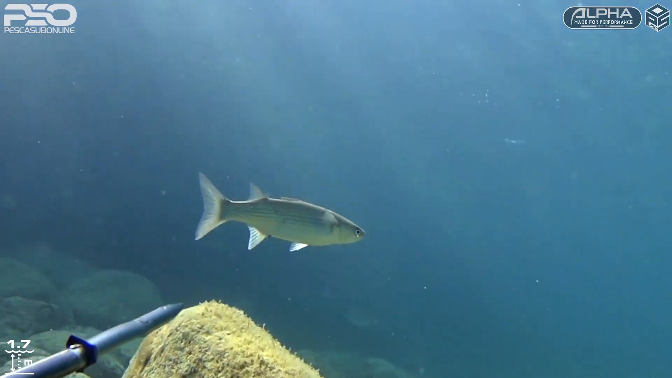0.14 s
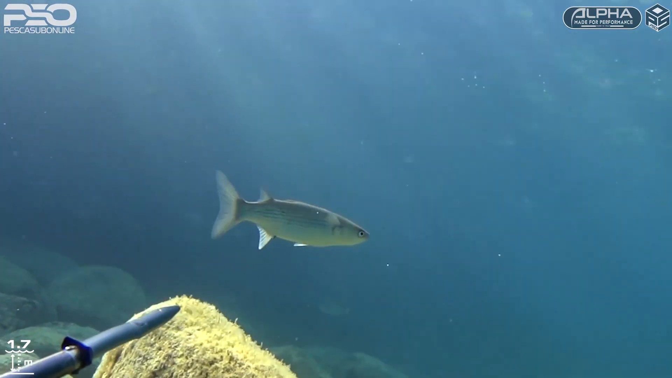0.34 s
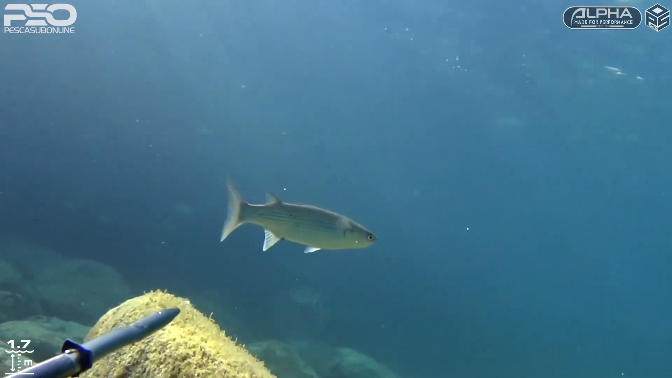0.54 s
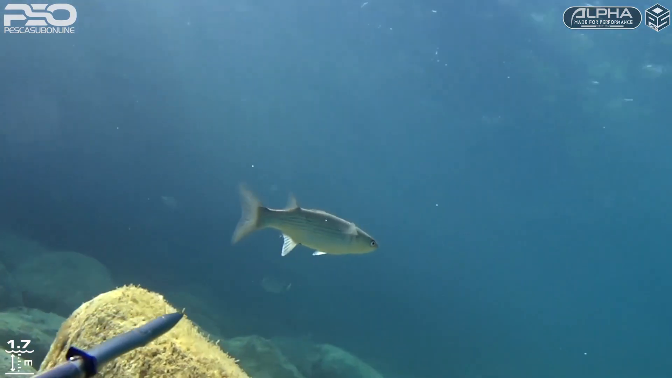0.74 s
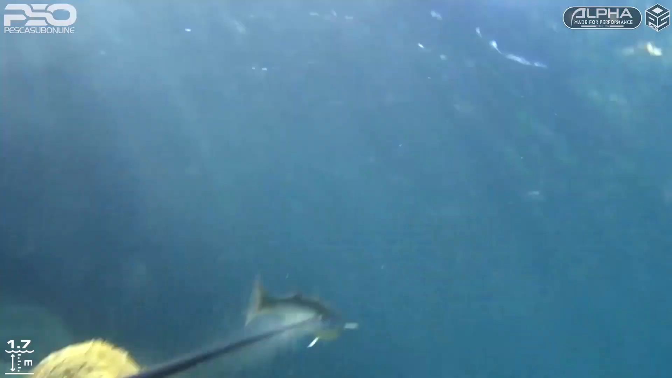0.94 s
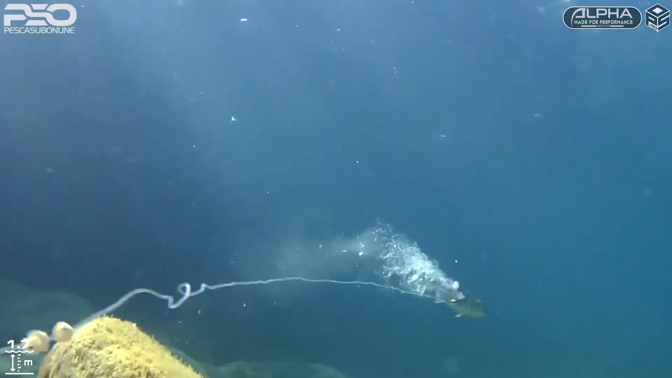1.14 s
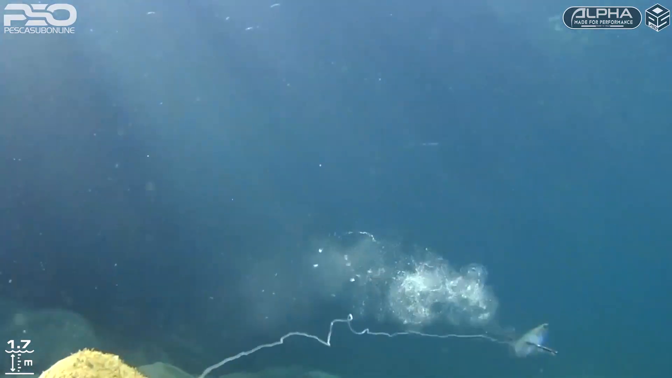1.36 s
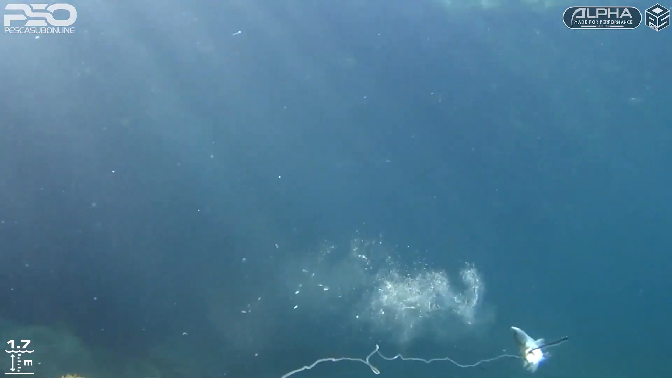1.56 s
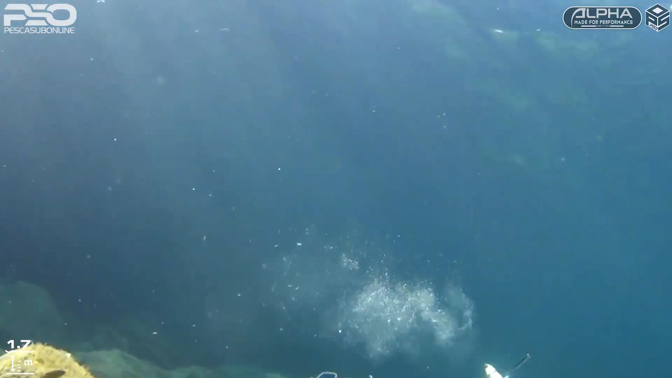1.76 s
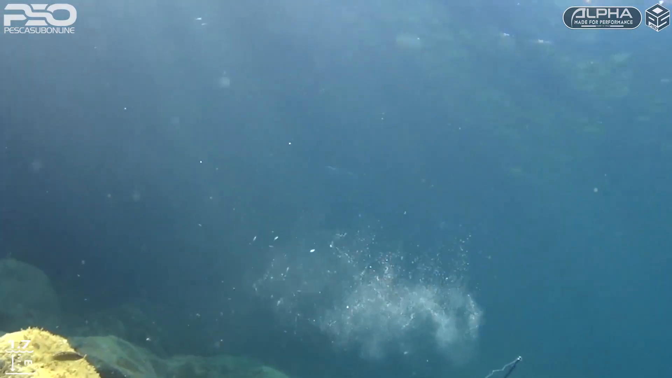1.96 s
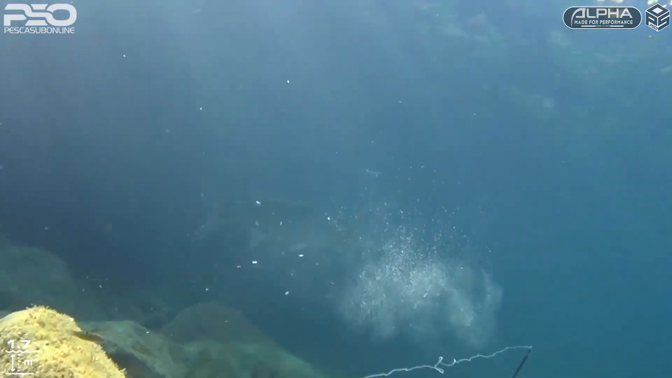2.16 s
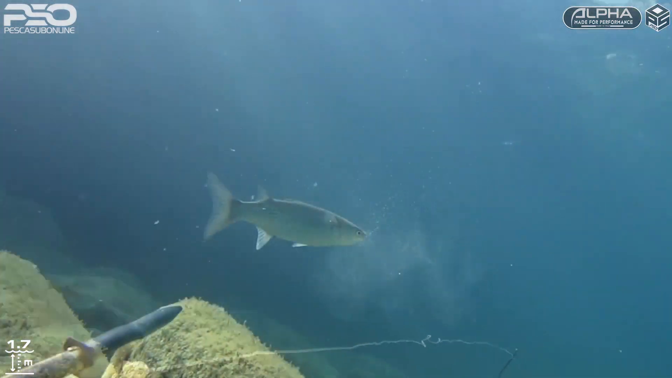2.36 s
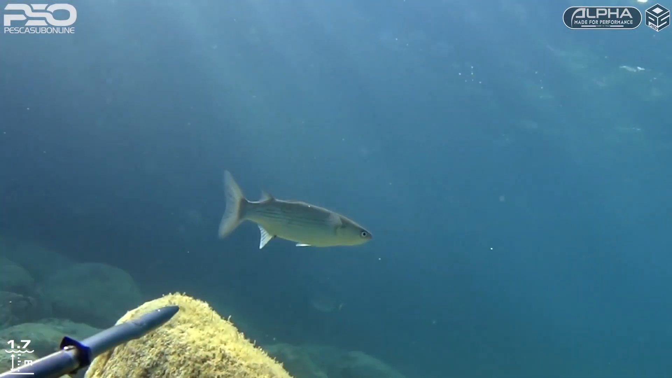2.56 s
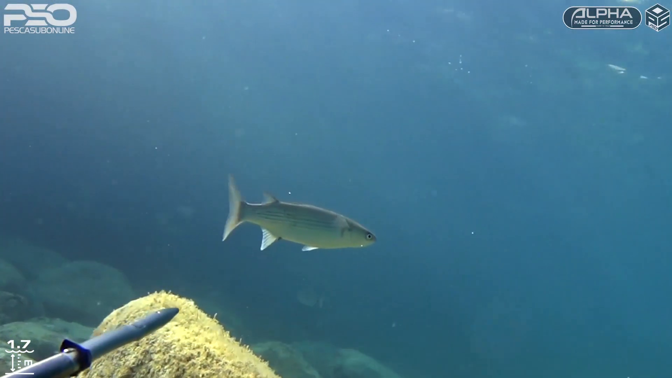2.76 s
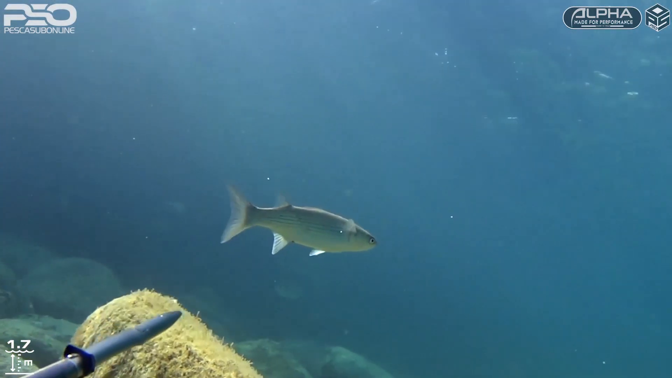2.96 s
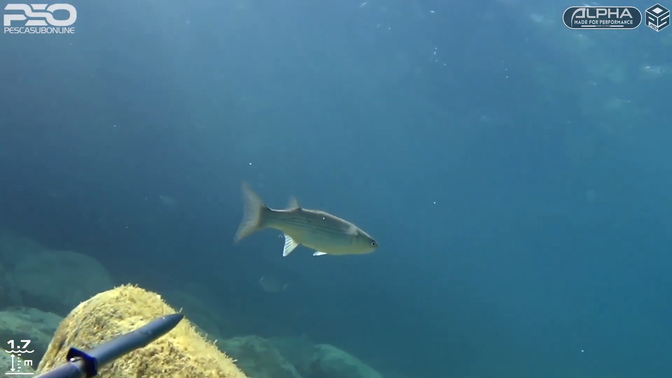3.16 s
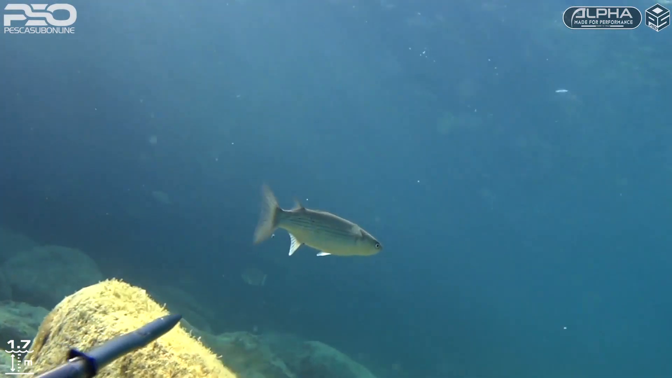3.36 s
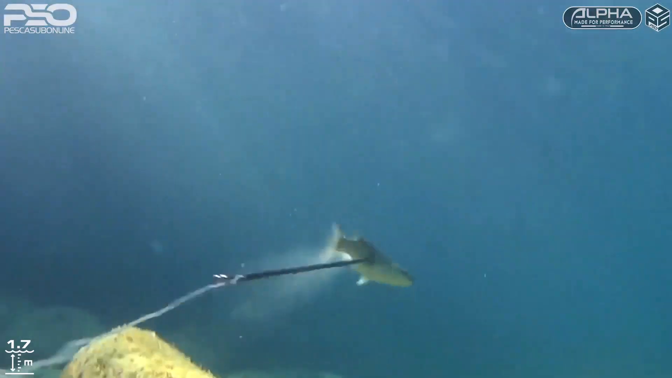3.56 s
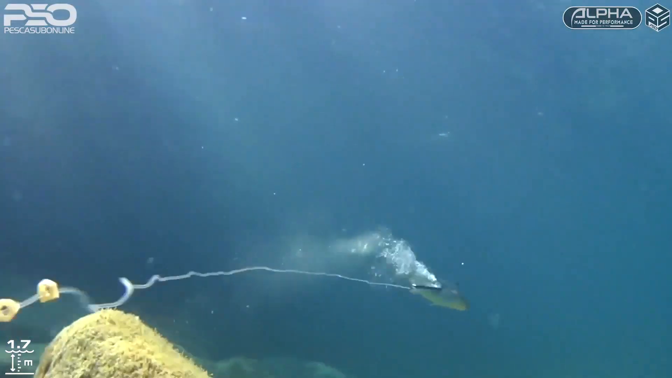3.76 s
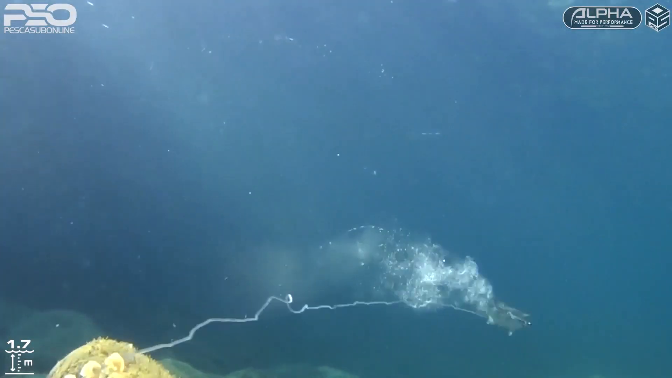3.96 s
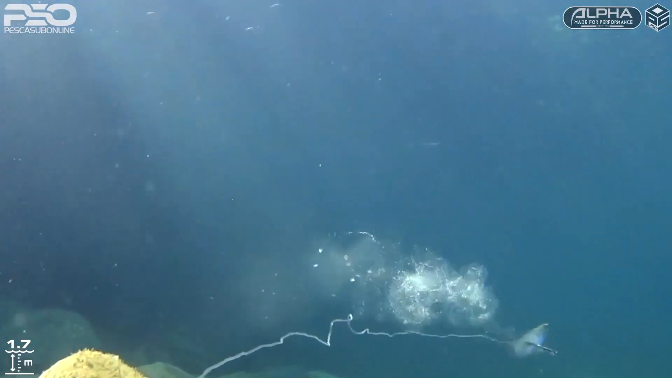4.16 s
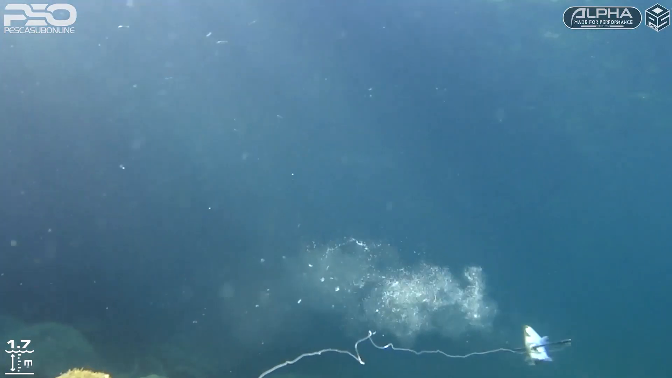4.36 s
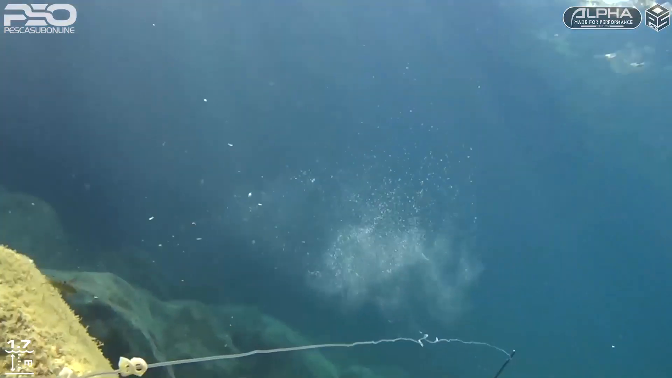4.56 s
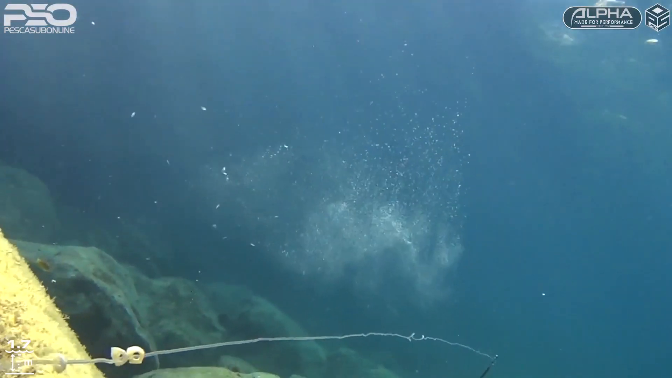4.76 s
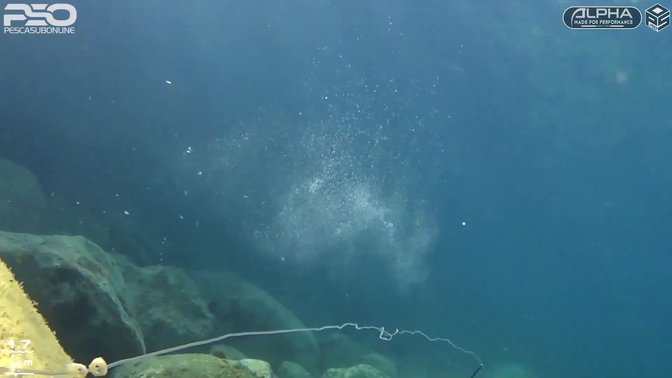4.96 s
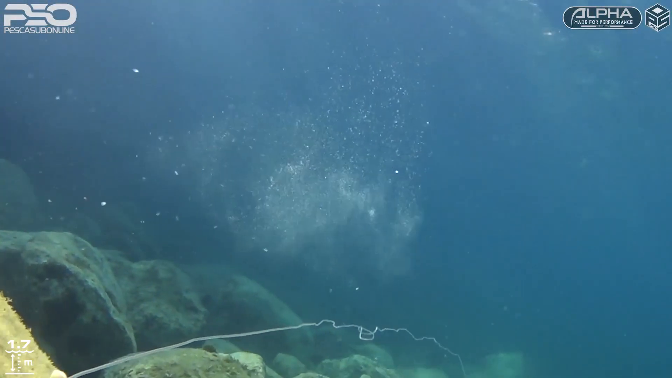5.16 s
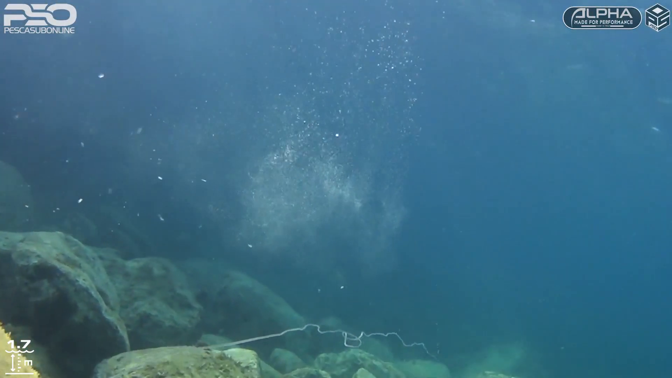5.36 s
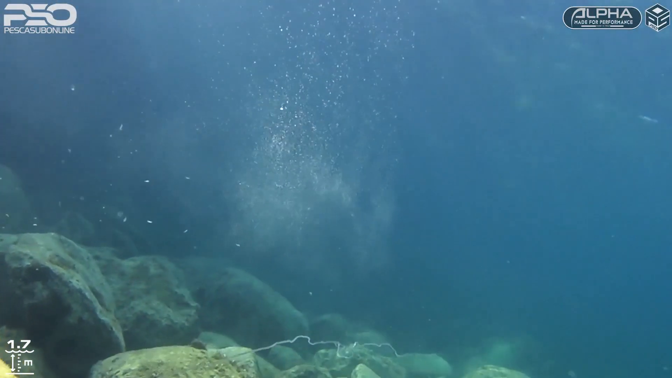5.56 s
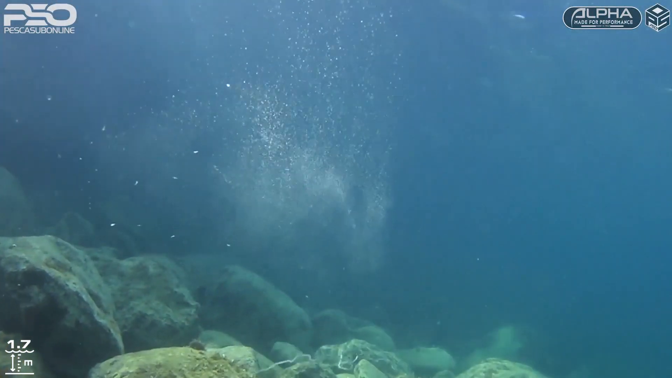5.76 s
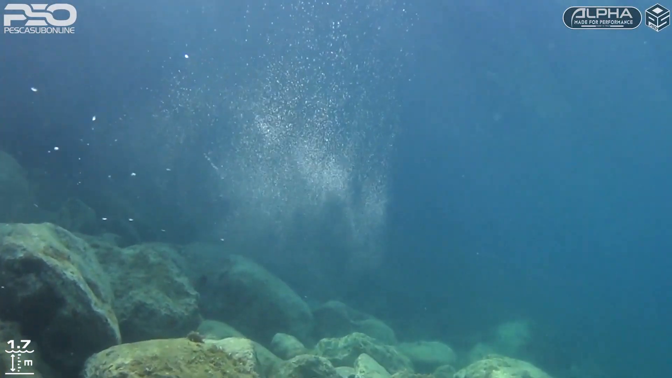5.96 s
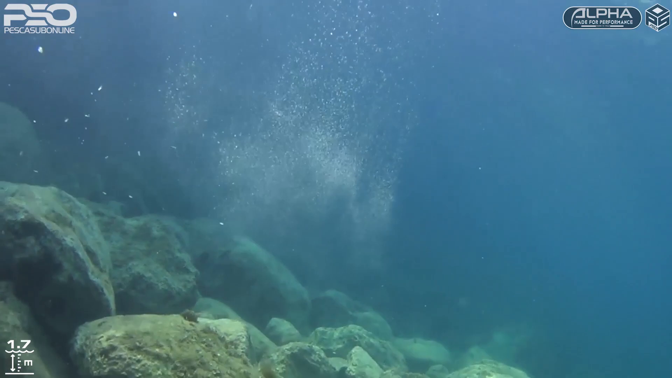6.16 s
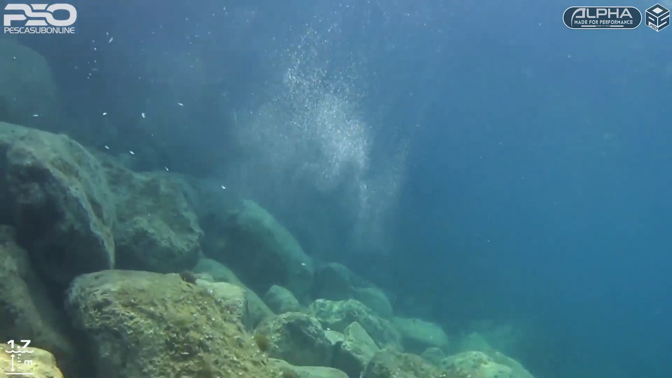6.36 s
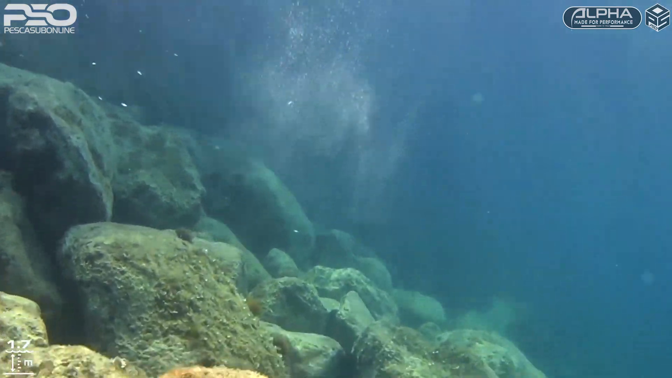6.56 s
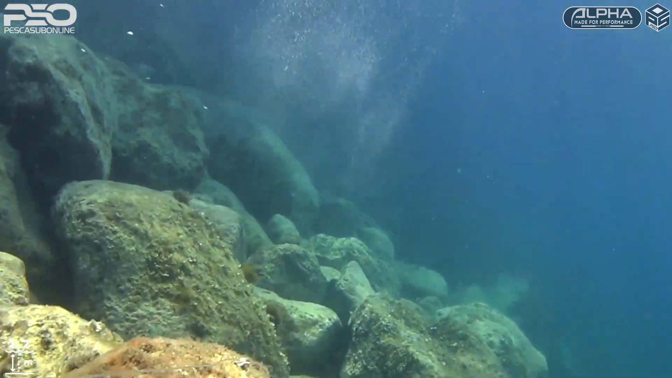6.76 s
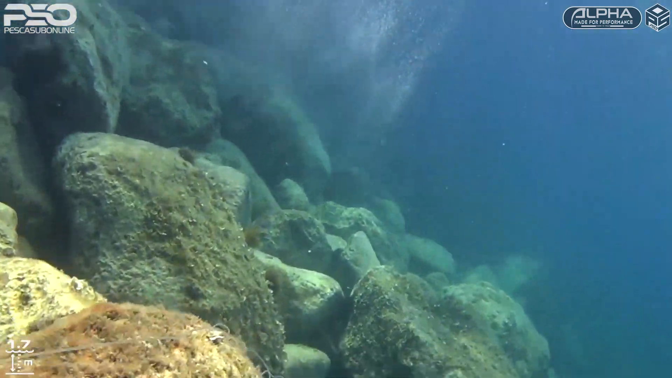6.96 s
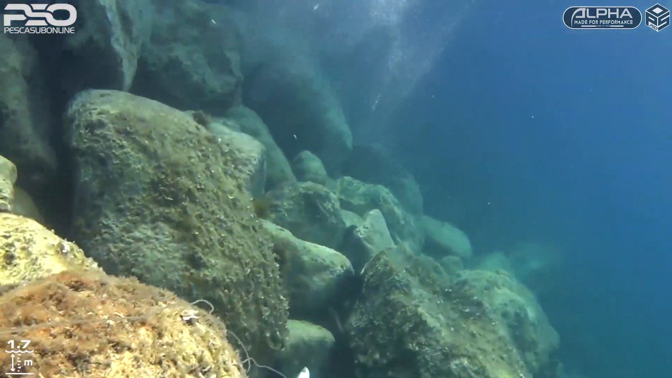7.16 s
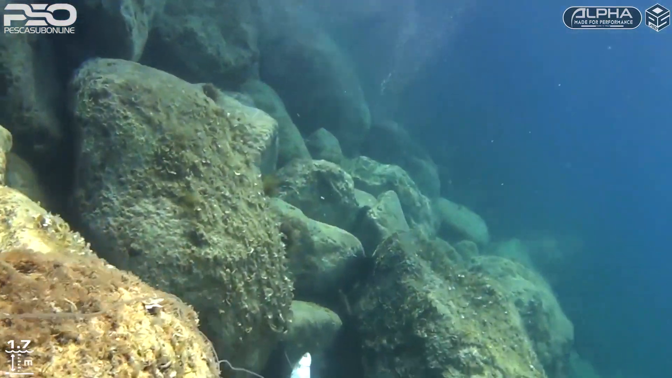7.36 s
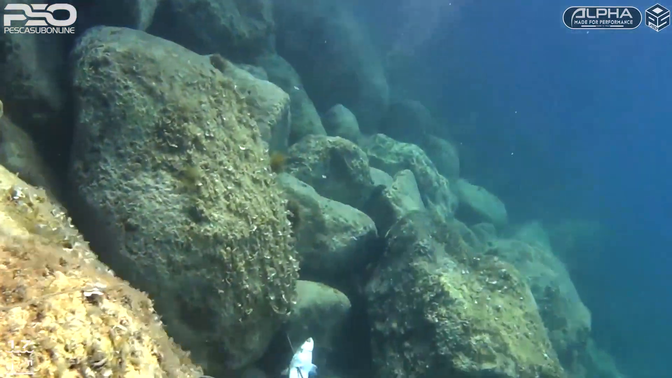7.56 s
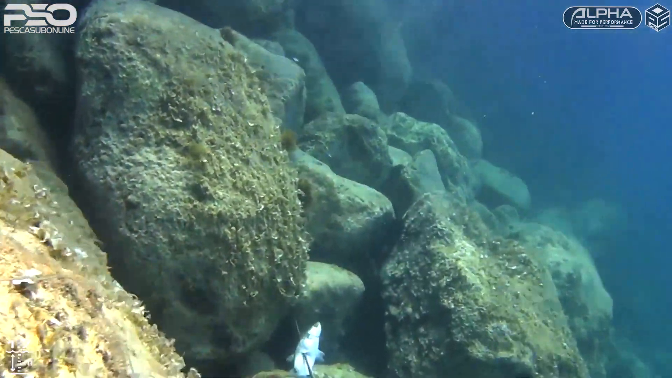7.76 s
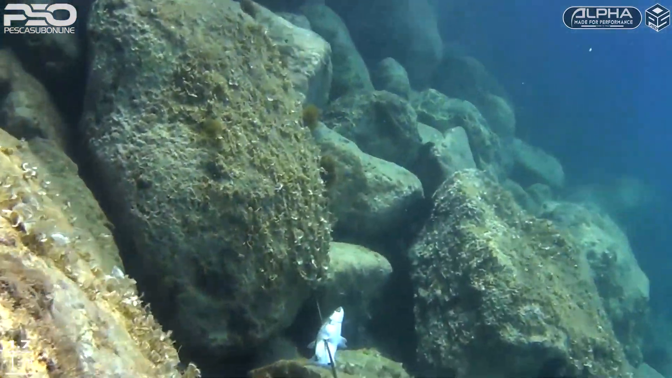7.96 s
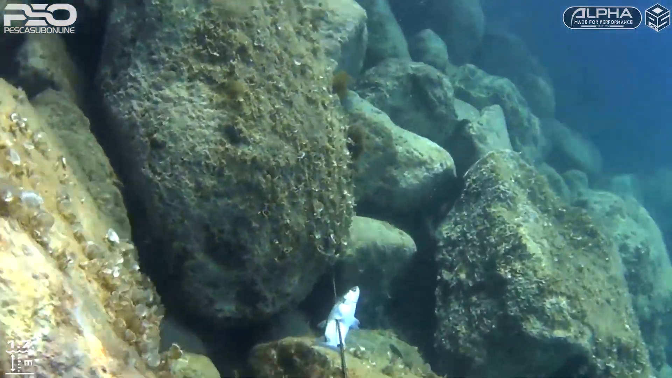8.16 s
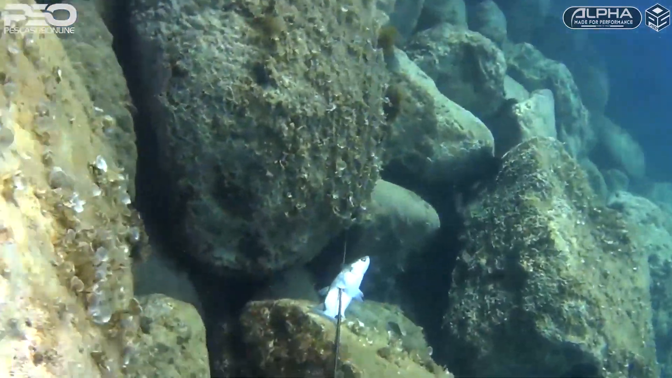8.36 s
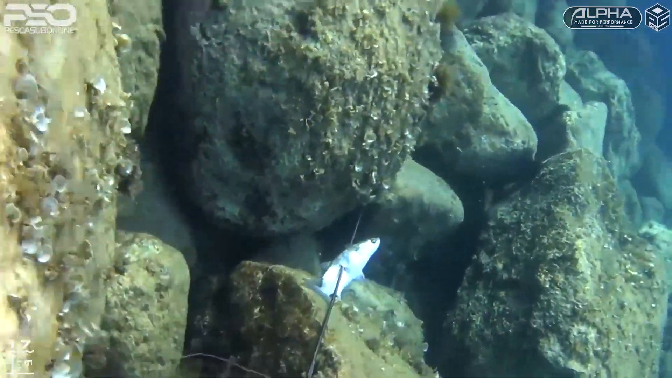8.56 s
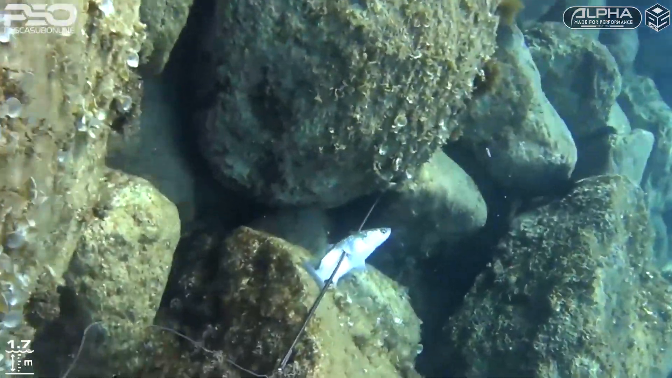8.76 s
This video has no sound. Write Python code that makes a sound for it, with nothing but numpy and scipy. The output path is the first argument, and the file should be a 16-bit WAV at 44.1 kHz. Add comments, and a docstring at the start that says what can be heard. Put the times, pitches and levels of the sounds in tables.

```python
"""Shallow sea, under water, heard from a stereo microphone in a housing fixed to a speargun.
Shrimp snap over a quiet hiss, then the gun fires at arm's length: the steel shaft rattles out, the
recoil overloads the microphone, shaft and line knock as they settle, and bubbles ring in the wake.
The shot plays again, slower and deeper. Then the line rubs on the gun and water rumbles over the
housing as the diver swims to the fish."""
import sys
import numpy as np
from scipy import signal
from scipy.fft import rfft, irfft
from scipy.io import wavfile
from scipy.ndimage import map_coordinates

SR = 44100
rng = np.random.default_rng(int(sys.argv[2]) if len(sys.argv) > 2 else 0)


def store_wav(level_fs):
    """Save 16-bit WAV to argv[1]."""
    pcm = np.round(np.clip(np.atleast_2d(level_fs), -1, 1) * 32767)
    wavfile.write(sys.argv[1], SR, pcm.T.astype(np.int16))


N = 388857
TIME = np.arange(N) / SR
SHOT_S = .951
REPLAY_START_S, REPLAY_END_S, REPLAY_SHOT_S, REPLAY_SPEED = 2.39, 4.56, 3.4347, .6
STILL_EDGE_HZ, SWIM_EDGE_HZ, MICROPHONE_EDGE_HZ = 11100, 8600, 11784

# Table levels are relative: each source sets its own gain. Spectra give level per hertz.
# still water all round, alike in both channels and opposed (frequency [Hz], level [dB])
STILL_SPECTRUM = [(12, -35), (20, 2), (49, -4), (90, -18.5), (273, -25), (312, -27.5), (406, -26.5),
                  (635, -30.5), (944, -31), (1080, -33), (5250, -42), (6840, -40.5), (11000, -44),
                  (14300, -72.5), (22000, -120)]
STILL_SIDE_SPECTRUM = [(12, -20.5), (20, -7), (49, -2.5), (108, -26), (184, -15.5), (346, -13.5),
                       (385, -18), (745, -16), (11000, -46.5), (14300, -65), (22000, -120)]
# faint, narrow whine in the background (frequency [Hz], level [dB])
WHINE_SPECTRUM = [(850, -45.5), (940, -17), (985, 0.5), (1020, -6.5), (1130, -42)]
# open water: its hiss, its opposed part and its low swell (frequency [Hz], level [dB])
HISS_SPECTRUM = [(530, -37), (900, -11), (1110, 0), (1240, -4), (1430, -3.5), (3440, -8.5), (4440, -7.5),
                 (5730, -10), (8130, -11), (8600, -14), (11200, -48), (18900, -120)]
OPEN_SIDE_SPECTRUM = [(12, -38), (20, -19), (49, 1.5), (96, -2.5), (294, -5.5), (352, -8), (663, -10),
                      (2420, -25.5), (4340, -31), (7970, -38), (8600, -42), (11200, -73), (18900, -120)]
SWELL_SPECTRUM = [(12, -17), (20, 6.5), (50, -5.5), (298, -23.5), (406, -23), (479, -29.5), (520, -24),
                  (822, -26), (1000, -33), (1300, -64.5), (2200, -120)]
# snaps of the nearest shrimp (time [s], level [dB])
NEAR_SHRIMP = [(0.7013, -61), (5.277, -57.5), (5.682, -58.5), (6.5925, -53), (7.656, -58), (8.302, -57),
               (8.505, -59), (8.523, -45), (8.7098, -56)]
# small taps on the gun (time [s], level [dB])
GUN_TAPS = [(.701, -49.5), (5.277, -42.5), (5.434, -52), (6.395, -59)]
# colour of a shrimp's snap and of a tap (frequency [Hz], level [dB])
SHRIMP_SPECTRUM = [(700, -28.5), (1300, -13), (3300, -14), (3900, -4), (4350, 2), (4900, -3.5), (5500, -10),
                   (6300, -11), (7200, -29.5), (8500, -15.5)]
TAP_SPECTRUM = [(620, -35), (780, -1.5), (950, 7), (1150, 2.5), (1500, -6), (2600, -14.5)]
# flow over the housing, following the diver's speed (time [s], level [dB])
FLOW_LEVELS = [(6.8, -58), (7.23, -46), (7.89, -47), (7.95, -43), (8.57, -40.5), (8.8, -44.5)]
# rumble right at the microphone: common part, opposed part, eddies (frequency [Hz], level [dB])
FLOW_SPECTRUM = [(20, 2), (60, 1), (115, -2.5), (165, -14), (330, -27), (490, -26.5), (630, -39.5),
                 (760, -29), (900, -40), (1200, -47.5)]
FLOW_SIDE_SPECTRUM = [(12, -46), (20, -5.5), (48, 6), (163, 5.5), (226, -0.5), (332, -11), (374, -8),
                      (744, -16), (874, -18), (2500, -33), (3250, -61), (5500, -120)]
EDDY_SPECTRUM = [(100, -11.5), (150, 12), (240, 0), (340, -9), (520, -15.5), (650, -29)]
# loudest bubbles passing the microphone (time [s], level [dB], pitch [Hz])
CLOSE_BUBBLES = [(7.443, -55.5, 768), (7.747, -46.5, 759), (8.104, -54, 764), (8.227, -54.5, 720)]
# tiny bubbles behind the shaft (frequency [Hz], level [dB])
FIZZ_SPECTRUM = [(2500, -3), (4200, -15), (5800, 4), (7000, -5), (8200, 1), (9200, -21)]
# gun resonances under the sliding line (frequency [Hz], half width [Hz], level [dB])
GUN_MODES = [(186, 22, 1), (277, 19, 7.5), (640, 15, -7), (754, 6.1, -5)]
# jerks of the line (time [s], low resonance level [dB], upper resonance level [dB])
LINE_JERKS = [(4.798, -38.5, -50.5), (4.845, -38.5, -52), (5.001, -37, -50), (5.177, -49, -68),
              (5.291, -46.5, -58), (5.428, -45, -54.5), (5.492, -42, -68), (5.607, -47.5, -57.5),
              (5.879, -47, -65), (6.013, -45, -60), (6.201, -46.5, -60), (6.397, -46, -45),
              (6.516, -45, -45), (6.556, -46, -49.5)]
# low and upper resonances of a jerk (frequency [Hz], level [dB])
JERK_LOW_SPECTRUM = [(110, -18.5), (175, -2.5), (225, -14.5), (290, 4), (340, -7), (400, -15), (500, -36.5)]
JERK_HIGH_SPECTRUM = [(280, -45), (480, -3), (512, -40), (549, -6.5), (712, -3), (755, -1.5), (914, -19.5),
                      (1200, -36), (1560, -28), (2640, -120)]
# the line snapping taut and flicking (time [s], crack level [dB], body level [dB])
LINE_SNAPS = [(1.1082, -22.5, -25), (1.183, -46, -35), (1.2121, -48.5, -37), (1.262, -51.5, -44.5),
              (1.321, -74, -45.5), (1.396, -70, -48.5)]
# knocks along shaft and line (time [s], level [dB], first pitch [Hz], last pitch [Hz], time scale [s])
SHAFT_KNOCKS = [(.058, -45, 656, 311, 0.0089), (.951, -9.5, 254, 152, 0.0017),
                (.954, -19, 865, 650, 0.0045), (0.999, -10.5, 191, 135, 0.0061),
                (1.011, -18.5, 794.6, 665, 0.0013), (1.018, -9.5, 643.5, 219, 0.0078),
                (1.041, -25, 893, 215, .0048), (1.1087, -14, 1060, 980, 0.00082),
                (1.26, -26, 610, 437, 0.0046), (1.4, -37, 666, 477, 0.006), (1.494, -41, 230, 139, .0048),
                (1.596, -43, 300, 159, 0.0062), (1.901, -46, 437, 320, 0.014)]
# water shoved by the bands and the gun (time [s], level [dB], time scale [s])
WATER_SHOVES = [(0.9748, -7, 0.0021), (0.9983, -14.5, 0.00098), (1.0329, -8, 0.0015), (1.069, -16.5, 0.003)]
# churning wake just ahead of the microphone (frequency [Hz], level [dB])
WAKE_SPECTRUM = [(25, -8), (60, 4.5), (115, 1.5), (180, -3), (290, -11.5), (400, -10.5), (600, -21),
                 (950, -20.5), (1250, -29.5), (1900, -50)]
# shaft and bands striking the gun (time [s], crack level [dB], body level [dB], crack decay [s])
GUN_BLOWS = [(0.9518, -27, -15, 0.0048), (0.955, -25.5, -22, 0.0058), (0.9786, -33.5, -12, .0065),
             (.988, -33.5, -21.5, .0027), (.998, -22.5, -12, 0.002), (1.0105, -37.5, -19.5, .004),
             (1.0168, -28, -10, 0.0026), (1.047, -40.5, -23.5, 0.0014), (1.0653, -38, -26.5, .0035),
             (1.071, -45.5, -32, 0.005)]
# a blow from close up: the crack, the gun's body, the steel shaft (frequency [Hz], level [dB])
CRACK_SPECTRUM = [(1060, -25.5), (1800, 2.5), (2010, 0.5), (2140, -4), (3200, -8), (3450, -13),
                  (4860, -10.5), (7500, -31.5), (9330, -40), (11500, -42), (15000, -77.5), (22000, -120)]
BODY_SPECTRUM = [(300, 7), (500, -8), (700, -1.5), (950, 3), (1150, -12), (1400, -6.5), (1650, -17.5),
                 (1900, -14), (2300, -46.5)]
STEEL_SPECTRUM = [(4400, -15), (5050, -0.5), (5500, -6), (6000, 3.5), (7000, -8), (8100, -5.5),
                  (8800, -8.5), (9600, -9), (10600, -16.5), (11400, -31)]


def amp(db):
    """Decibels to gain."""
    return 10 ** (np.asarray(db) / 20)


def noise(spectrum):
    """Noise of rms 1 with the given spectrum, falling steeply past its ends."""
    hz, db = np.transpose(spectrum)
    octave, known = np.log2(np.fft.rfftfreq(N, 1 / SR) + 1), np.log2(hz + 1)
    outside = np.maximum(known[0] - octave, 0) + np.maximum(octave - known[-1], 0)
    colour = amp(np.interp(octave, known, db) - 33 * outside)
    x = irfft(rfft(rng.standard_normal(N)) * colour, N)
    return x / x.std()


def stereo(common, opposed):
    """Pressure reaches both capsules alike; shaking of the housing moves them in opposition."""
    return np.array([common + opposed, common - opposed])


def stereo_noise(spectrum, side_db):
    """Coloured noise with its opposed part side_db above the common part."""
    return stereo(noise(spectrum), amp(side_db) * noise(spectrum))


def bursts(starts, dbs, decay_s, rise_s):
    """Envelope of blows that rise quickly and die away; their powers add."""
    power = np.zeros(N)
    for start, db, decay in np.broadcast(starts, dbs, decay_s):
        at = slice(int(start * SR), int(start * SR) + SR // 2)
        age = np.maximum(TIME[at] - start, 0)
        power[at] += (amp(db) * (1 - np.exp(-age / rise_s)) * np.exp(-age / decay)) ** 2
    return np.sqrt(power)


def envelope(start_s, db, attack_s, hold_s, fade_db_per_s, slope_db_per_s=0):
    """Gain that rises, holds with a slope, then fades."""
    age = np.maximum(TIME - start_s, 0)
    held, released = np.minimum(age, hold_s), np.maximum(age - hold_s, 0)
    level_db = db + slope_db_per_s * held - fade_db_per_s * released
    return np.minimum(age / attack_s, 1) * amp(np.maximum(level_db, -200))


def flutter(per_s, depth_db):
    """Random swelling and sinking of a gain, with mean power 1."""
    knots = np.arange(0, TIME[-1] + 1, 1 / per_s)
    gain = amp(depth_db * np.interp(TIME, knots, rng.standard_normal(N)[:len(knots)]))
    return gain / np.sqrt(np.mean(gain ** 2))


def scattered(start_s, length_s, count):
    """Random moments, one in each equal part of a stretch of time."""
    return start_s + length_s * (np.arange(count) + rng.random(count)) / count


def lowpass(x, hz):
    """Steep band limit on both channels."""
    return signal.oaconvolve(x, signal.firwin(401, hz, window=("kaiser", 8), fs=SR)[None], "same")


def still_water():
    """Quiet sea all round, dipping after the shot; a faint whine chirps once and slowly grows."""
    sea = stereo(amp(-57) * noise(STILL_SPECTRUM), amp(-60) * noise(STILL_SIDE_SPECTRUM))
    dip = amp(np.interp(TIME - SHOT_S, [0, .2, 1.45], [0, -3.5, 0]))
    whine = amp(-93.5 + 9.5 * np.minimum(TIME, REPLAY_START_S))
    chirp = bursts(.111, -56, decay_s=.022, rise_s=.015)
    return sea * dip + (whine + chirp) * noise(WHINE_SPECTRUM)


def open_water(step_s=6.4, step_db=3):
    """Low swell of the open sea, under a hiss that steps up once."""
    hiss = amp(-72 + step_db * (TIME > step_s)) * noise(HISS_SPECTRUM)
    swell = amp(-56) * noise(SWELL_SPECTRUM)
    return stereo(hiss + swell, amp(-57.5) * noise(OPEN_SIDE_SPECTRUM))


def shrimp_and_taps(far_count=110):
    """Shrimp snap among the rocks, many far off and a few near; small things tap the gun."""
    near = bursts(*np.transpose(NEAR_SHRIMP), decay_s=.003, rise_s=.00027)
    when, nearness = rng.random((far_count, 2)).T
    far = bursts(when * TIME[-1], -71 + 10 * nearness ** 2, decay_s=.0022, rise_s=.00018)
    tap_gain = bursts(*np.transpose(GUN_TAPS), decay_s=.0027, rise_s=.00033)
    taps = tap_gain * stereo_noise(TAP_SPECTRUM, side_db=-7)
    return (near + far) * stereo_noise(SHRIMP_SPECTRUM, side_db=-7) + taps


def housing_flow():
    """Water rumbles right on the microphone housing; eddies stand out as the diver gathers speed."""
    fade_in = np.interp(TIME, [6.3, 7.0], [0, 1])
    flow = fade_in * amp(np.interp(TIME, *np.transpose(FLOW_LEVELS)))
    rumble = stereo(noise(FLOW_SPECTRUM), amp(-5.5) * noise(FLOW_SIDE_SPECTRUM))
    eddies = amp(-8) * flow / flow.max() * stereo_noise(EDDY_SPECTRUM, side_db=-8)
    return flow * flutter(25, depth_db=2) * (rumble + eddies)


def bubble_rings(rows, rise_s=.0025, decay_s=.013):
    """Each bubble (time [s], relative level [dB], pitch [Hz]) rings at the pitch its size sets."""
    rings = np.zeros(N)
    for start, db, hz in rows:
        at = slice(int(start * SR), int(start * SR) + SR // 5)
        age = np.maximum(TIME[at] - start, 0)
        shape = (1 - np.exp(-age / rise_s)) * np.exp(-age / decay_s)
        rings[at] += amp(db) * shape * np.sin(2 * np.pi * hz * age)
    return amp(5.5) * stereo(rings, -.3 * rings)


def passing_bubbles(count=9, pitch_hz=740, spread=.079):
    """A few distinct bubbles and a softer, second-long trickle slip close past the microphone."""
    when, softness, size = rng.random((count, 3)).T
    pitches = pitch_hz * (1 - spread * (2 * size - 1))
    trickle = zip(7.1 + when, -56.5 - 7 * softness, pitches)
    return bubble_rings([*CLOSE_BUBBLES, *trickle])


def fizz(count=500, rise_s=.002, decay_s=.009):
    """Tiny bubbles behind the shaft: a hissing flush, then a faint cloud of separate rings."""
    rings, age = np.zeros(N), np.arange(SR // 20) / SR
    shape = np.exp(-age / decay_s) * (1 - np.exp(-age / rise_s))
    for when, pitch, softness in rng.random((count, 3)):
        start, hz = int((1 + 1.4 * when) * SR), 2500 + 6700 * pitch
        gain = amp(np.interp(hz, *np.transpose(FIZZ_SPECTRUM)) - 5.2 * softness)
        rings[start:start + len(age)] += gain * shape * np.sin(2 * np.pi * hz * age)
    cloud = amp(-83) * rings / rings[SR:2 * SR].std()
    flush = envelope(.93, -67, attack_s=.02, hold_s=.24, fade_db_per_s=182)
    swarm = cloud + flush * flutter(200, depth_db=7) * noise(FIZZ_SPECTRUM)
    return stereo(swarm, .15 * swarm)


def gurgle(count=28, start_s=1.7, fade_db_per_s=8, pitch_hz=416, spread_octaves=.59):
    """The larger bubbles of the cloud break up more and more softly."""
    age = scattered(0, length_s=.99, count=count)
    softness, size = rng.random((count, 2)).T
    levels = -57 - fade_db_per_s * age - 8 * softness
    pitches = pitch_hz * 2 ** (spread_octaves * (.5 - size))
    return bubble_rings(zip(start_s + age, levels, pitches))


def line_drag():
    """Friction of the sliding line keeps the gun's resonances murmuring, louder as it tightens."""
    bins_hz = np.fft.rfftfreq(N, 1 / SR)
    response = sum(amp(db) / (1 + ((bins_hz - hz) / width) ** 2) for hz, width, db in GUN_MODES)
    common, opposed = irfft(rfft(rng.standard_normal((2, N))) * response, N)
    pull = envelope(4.78, -64.5, attack_s=.034, hold_s=1.84, fade_db_per_s=140, slope_db_per_s=6)
    return pull * flutter(28, depth_db=7.5) * stereo(common, amp(-21) * opposed) / common.std()


def line_rubs(decay_s=.031):
    """Close by, the line drags in short, rough jerks that sound two resonances of the gun."""
    starts, low_db, high_db = np.transpose(LINE_JERKS)
    low = bursts(starts, low_db, decay_s, rise_s=.0034) * stereo_noise(JERK_LOW_SPECTRUM, side_db=-5)
    high = bursts(starts, high_db, decay_s, rise_s=.00093) * stereo_noise(JERK_HIGH_SPECTRUM, side_db=-5)
    return (amp(-2.5) * low + amp(-4.5) * high) * flutter(150, depth_db=.5)


def line_snaps():
    """The line jerks tight with a dry click, then flicks more and more softly."""
    starts, crack_db, body_db = np.transpose(LINE_SNAPS)
    crack = amp(-3) * bursts(starts, crack_db, decay_s=.0016, rise_s=.0002)
    body = bursts(starts, body_db, decay_s=.00584, rise_s=.0018)
    return crack * stereo_noise(CRACK_SPECTRUM, side_db=-2) + body * stereo_noise(BODY_SPECTRUM, side_db=6)


def shaft_knocks(surface_delay_s=.0023, surface_gain=.25):
    """Bending waves carry high tones fastest, so each knock falls in pitch, wobbling with the chatter."""
    direct = np.zeros((2, N))
    chatter, wobble = flutter(500, depth_db=2.8), flutter(600, depth_db=1.1)
    for start, db, first_hz, last_hz, scale_s in SHAFT_KNOCKS:
        at = slice(int(start * SR), int(start * SR) + SR // 5)
        progress = np.maximum(TIME[at] - start, 0) / scale_s
        hz = (last_hz + (first_hz - last_hz) * np.exp(-progress)) * wobble[at]
        shape = np.sqrt(progress) * np.exp(-progress ** 2 / 5)
        tone = amp(db) * shape * chatter[at] * np.exp(2j * np.pi * np.cumsum(hz) / SR)
        # the housing shakes less once the shaft is gone
        side_db = np.interp(abs(start - SHOT_S), [0, .35], [2, -4])
        direct[:, at] += stereo(tone.imag, amp(side_db) * tone.real)
    # the surface overhead mirrors the sound upside down
    echo = -surface_gain * np.roll(direct, int(surface_delay_s * SR), axis=1)
    return amp(-3) * (direct + echo)


def recoil(kick_s=.9782, length_s=.0155, shake_hz=185, shake_db=6):
    """The kick shakes the microphone housing; the bands shove water aside and leave a churning wake."""
    age = TIME - kick_s
    progress = np.clip(age / length_s, 0, 1)
    shake = amp(shake_db) * np.sin(np.pi * progress) * np.sin(2 * np.pi * shake_hz * age)
    push = np.zeros(N)
    for centre, db, scale_s in WATER_SHOVES:
        u = (TIME - centre) / (2 * scale_s)
        push += amp(db) * (1 - 2 * u ** 2) * np.exp(-np.minimum(u ** 2, 50))  # suction either side
    churn = envelope(SHOT_S, -19.5, attack_s=.003, hold_s=.13, fade_db_per_s=261, slope_db_per_s=-30)
    swirl = envelope(SHOT_S, -34.5, attack_s=.05, hold_s=0, fade_db_per_s=33.5)
    wake = np.hypot(churn * flutter(70, depth_db=3.5), swirl * flutter(39, depth_db=4))
    return stereo(push, shake) + wake * stereo_noise(WAKE_SPECTRUM, side_db=2.5)


def shaft_rattle(rise_s=.0003, chatter_fade_db_per_s=84.5):
    """At arm's length the shaft slides and chatters out; each blow cracks and rings steel and gun."""
    starts, crack_db, body_db, decay_s = np.transpose(GUN_BLOWS)
    slide = envelope(SHOT_S, -37.5, attack_s=.003, hold_s=.032, fade_db_per_s=220)
    chatter_times = scattered(SHOT_S, length_s=.11, count=16)
    chatter_db = -38.5 - chatter_fade_db_per_s * (chatter_times - SHOT_S)
    chatter = bursts(chatter_times, chatter_db, decay_s=.0028, rise_s=rise_s)
    blows = np.hypot(bursts(starts, crack_db, decay_s, rise_s), chatter)
    crack = amp(-2) * np.hypot(blows, slide) * stereo_noise(CRACK_SPECTRUM, side_db=.5)
    # the steel rings less as the shaft leaves the gun
    leaving = envelope(SHOT_S, -6, attack_s=.011, hold_s=.028, fade_db_per_s=46)
    steel = leaving * np.hypot(blows, amp(-1) * chatter) * stereo_noise(STEEL_SPECTRUM, side_db=-6.5)
    thuds = bursts(starts, body_db, 1.2 * decay_s, rise_s)
    scrape = amp(8) * np.hypot(slide, chatter)
    body = amp(.5) * np.hypot(thuds, scrape) * stereo_noise(BODY_SPECTRUM, side_db=1.5)
    grit = flutter(1500, depth_db=2.5)
    return (crack + steel) * grit + body


def scene():
    """From the gun: the shot in still water, then the swim to the fish, both leaning slightly right."""
    ticks = shrimp_and_taps()
    background = lowpass(still_water() + ticks + fizz(), STILL_EDGE_HZ) * amp([[-.6], [.6]])
    shot = shaft_rattle() + line_snaps() + shaft_knocks() + recoil() + gurgle() + background
    swim = open_water() + housing_flow() + line_rubs() + line_drag() + passing_bubbles() + ticks
    swim = lowpass(swim, SWIM_EDGE_HZ) * amp([[-.7], [.7]])
    return np.where(TIME < REPLAY_END_S, shot * amp([[-.3], [.3]]), swim)


def record(dry):
    """The band-limited microphone overloads this close to the gun; the shot replays slower and deeper."""
    overloaded = dry / (1 + dry ** 6) ** (1 / 6)
    live = lowpass(overloaded, MICROPHONE_EDGE_HZ)
    read_at = (SHOT_S + (TIME - REPLAY_SHOT_S) * REPLAY_SPEED) * SR
    slow = np.array([map_coordinates(channel, [read_at], order=3) for channel in live])
    replaying = (TIME >= REPLAY_START_S) & (TIME < REPLAY_END_S)
    return lowpass(np.where(replaying, slow, live), MICROPHONE_EDGE_HZ)


dry = scene()
out = record(dry)
store_wav(out)
```